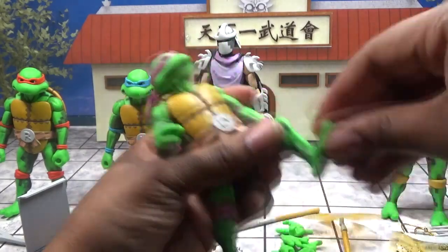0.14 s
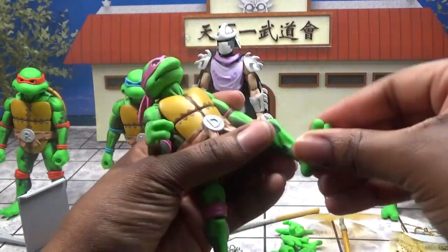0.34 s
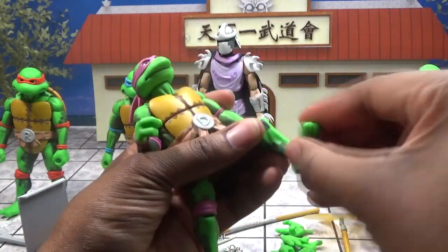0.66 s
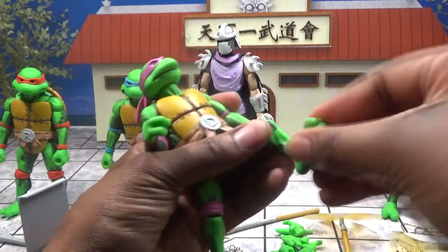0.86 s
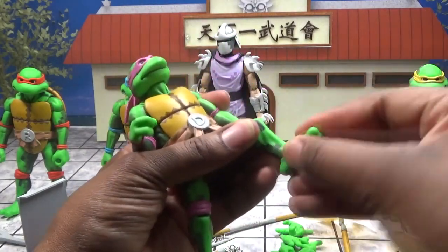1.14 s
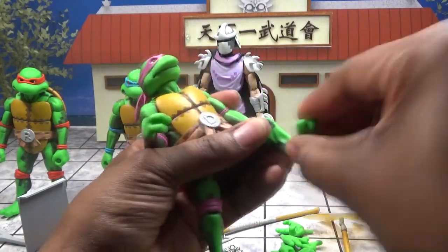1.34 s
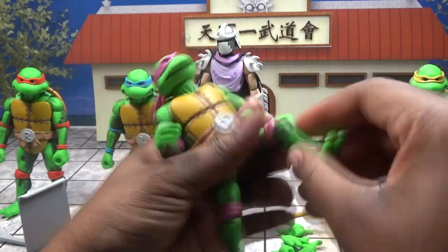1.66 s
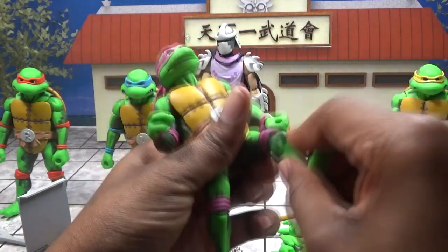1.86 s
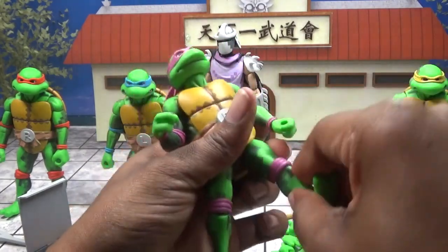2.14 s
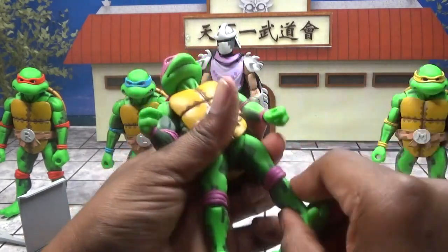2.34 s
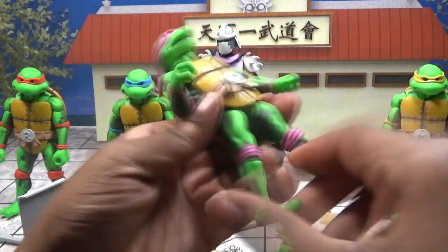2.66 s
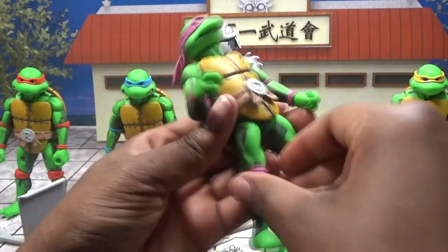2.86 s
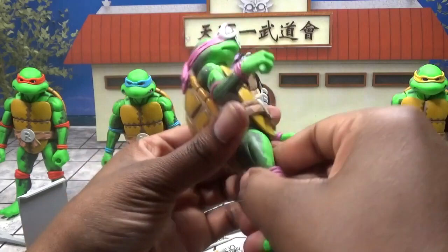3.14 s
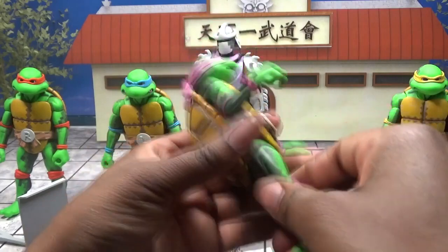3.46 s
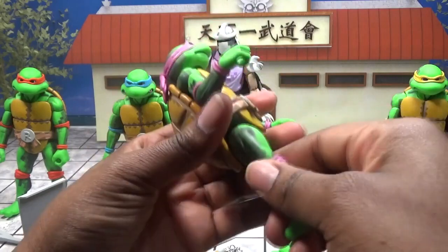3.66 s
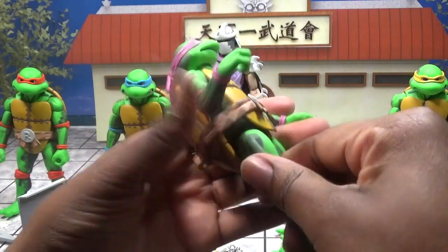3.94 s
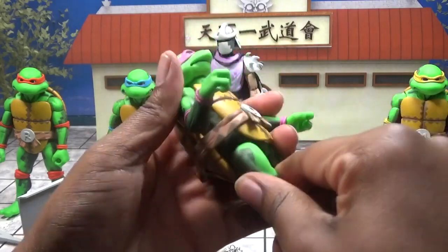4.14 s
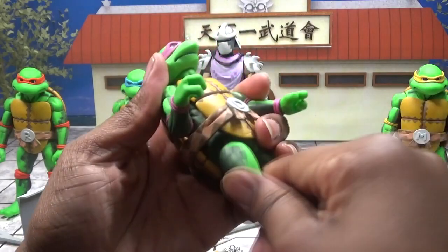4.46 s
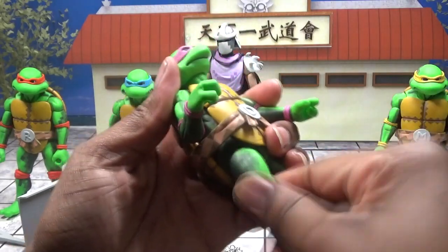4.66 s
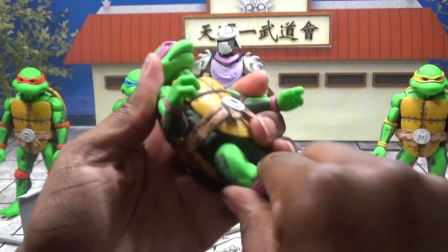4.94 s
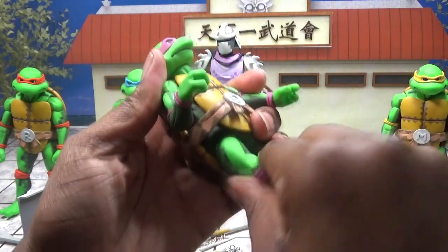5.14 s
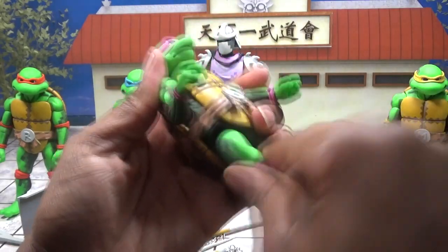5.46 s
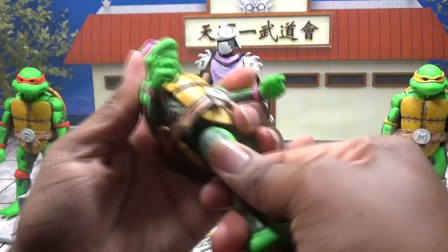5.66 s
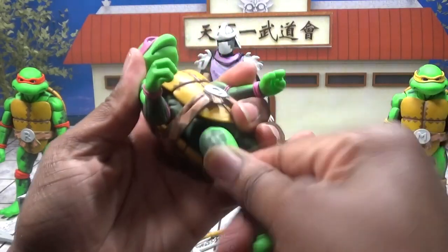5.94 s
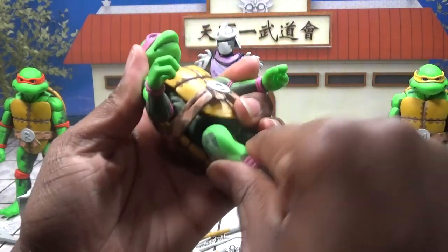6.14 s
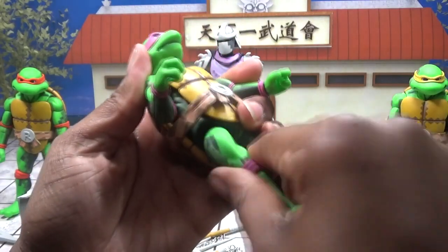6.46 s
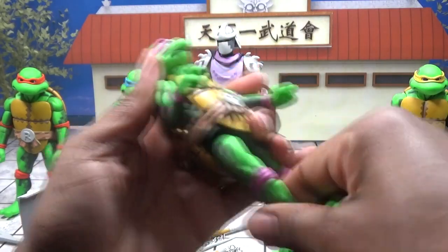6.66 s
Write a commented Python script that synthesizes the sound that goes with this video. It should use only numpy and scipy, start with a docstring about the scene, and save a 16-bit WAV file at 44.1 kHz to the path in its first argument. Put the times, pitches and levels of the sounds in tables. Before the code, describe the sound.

Close, dry handling of a jointed plastic toy indoors: quiet skin rubs and tiny clusters of clicks, occasional brighter snaps, then a dense burst of hard ratchety clacks with brief gritty slides. The clicking eases to medium, uneven ticks until near the end. Each is very short, bright and slightly hollow, with little room reflection. Faint low rumble, mains hum and barely audible distant tones lie behind.

```python
"""Stiff joints of a hollow toy figure

Hands twist the joints of a hollow plastic figure close by in a quiet room. Each slip clicks and rings
damped modes of shell, limb and joint pin. Fingers and sliding joint faces rub as shaped noise with tiny
slips; one joint squeaks. Far low tones drift upward over hum, hiss and a rumble that dips, then grows."""
import sys
import numpy as np
from scipy import signal
from scipy.fft import rfft, irfft, next_fast_len
from scipy.io import wavfile
from scipy.ndimage import uniform_filter1d

SR = 44100
rng = np.random.default_rng(int(sys.argv[2]) if len(sys.argv) > 2 else 0)


def transcribe(u):
    """Save the signal u as a 16-bit wav file named by the first command-line argument.

    u: samples, shape (n,) or (channels, n), limited to [-1, 1]; the rate is SR.
    q: integer samples, one column per channel.
    """
    v = np.clip(np.atleast_2d(u).T, -1, 1)
    q = np.round(v * 32767).astype(np.int16)
    wavfile.write(sys.argv[1], SR, q)


N = 300321
FFT_SIZE = next_fast_len(N)
BINS_HZ = np.fft.rfftfreq(FFT_SIZE, 1 / SR)
RING_SAMPLES = 1024

# joint slips, drive levels: start_s, hollow_db, snap_db
SLIPS = [(0.062, -100, -41), (0.082, -75, -70), (0.3867, -48, -47), (0.412, -46.5, -51), (0.464, -60, -51),
         (0.5297, -56.5, -45.5), (0.5448, -56, -51), (0.558, -52, -45.5), (0.72, -54, -47.5),
         (0.738, -54.5, -51), (0.945, -58, -41), (0.9594, -47.5, -41), (0.974, -51, -42.5),
         (1.0058, -70, -44), (1.3986, -67, -42.5), (1.414, -55, -46), (1.4449, -52.5, -39),
         (1.5906, -50, -42.5), (1.657, -62, -41.5), (1.752, -59, -49), (1.83, -50, -46), (1.8608, -83, -43),
         (1.894, -53, -49), (1.952, -58, -52), (1.976, -53, -57), (1.9864, -51, -51), (2.0017, -42.5, -54),
         (2.014, -49, -42), (2.033, -47, -36), (2.0519, -37, -39), (2.073, -47, -36.5),
         (2.2552, -46.5, -34.5), (2.287, -44, -46), (2.3345, -64, -41.5), (2.3893, -36, -32),
         (2.432, -38, -38.5), (2.773, -46, -50), (3.127, -46, -62), (3.0842, -40, -24),
         (3.1657, -54, -43.5), (3.331, -50, -44.5), (3.4008, -55, -42), (3.821, -60, -46.5),
         (3.873, -40, -28.5), (3.945, -50.5, -48), (3.972, -51, -47), (4.183, -70, -46.5),
         (4.2695, -51, -42), (4.2889, -44, -37), (4.2955, -32.5, -31), (4.374, -62, -29.5),
         (4.3897, -40.5, -28), (4.4864, -35, -34.5), (4.5545, -27, -46), (4.5659, -26.5, -34),
         (4.579, -31, -37), (4.601, -28, -31), (4.6162, -36, -46), (4.6452, -35.5, -68),
         (4.7468, -24.5, -33.5), (4.812, -23, -19), (4.8301, -16.5, -11.5), (4.9102, -14.5, -11),
         (5.028, -27, -51), (5.031, -13.5, -9.5), (5.0657, -17, -9.5), (5.152, -15.5, -8.5),
         (5.2464, -43.5, -40), (5.2688, -30, -17.5), (5.316, -41, -58), (5.3799, -35.5, -39),
         (5.392, -29.5, -31), (5.401, -28, -42), (5.4636, -35.5, -57), (5.4694, -41, -35),
         (5.489, -32.5, -31), (5.5475, -19.5, -34.5), (5.6366, -37.5, -26), (5.6445, -26.5, -18),
         (5.7134, -35.5, -32.5), (5.7216, -35, -29.5), (5.734, -29, -33), (5.768, -31.5, -33),
         (5.7985, -34.5, -31), (5.83, -35, -36), (5.862, -29, -63), (5.942, -36.5, -37),
         (5.9585, -27.5, -20), (5.997, -34.5, -48), (6.0313, -35, -42), (6.062, -37.5, -33),
         (6.1594, -33, -28), (6.1721, -32, -44), (6.2072, -30, -53), (6.2986, -38, -27.5),
         (6.304, -33, -33), (6.357, -36, -36), (6.3734, -43, -37.5), (6.4333, -31, -32.5),
         (6.471, -40, -48), (6.499, -22.5, -34), (6.5946, -50, -31.5), (6.6358, -44.5, -38)]
# hollow shell modes: pitch_hz, relative_db, t60_s
HOLLOW_MODES = [(2044, 8, 0.011), (2416, 2, 0.005), (2720, 0, 0.0056)]
# limb modes: pitch_hz, relative_db, t60_s
KNOCK_MODES = [(3070, -5.5, 0.0015), (3760, -7, 0.0023)]
# joint pin modes: pitch_hz, relative_db, t60_s
SNAP_MODES = [(5930, 7.5, 0.0013), (6940, -6.5, 0.0025), (7830, -4.5, 0.0024), (8830, -2, 0.0022),
              (10200, -3, 0.0014), (13700, -10, 0.0012)]
# hand holding the figure takes the jolt: pitch_hz, relative_db, t60_s
THUD_MODES = [(790, -0.5, 0.0093)]
# limb knocks against shell: start_s, drive_db
LIMB_TAPS = [(4.375, -33)]


def joints():
    """Every slip rings shell, limb and joint pin, after a weak creep as the joint starts to give."""
    start_s, hollow_db, snap_db = np.transpose(SLIPS)[:, :, None]
    n = len(SLIPS)
    knock_db = 0.45 * hollow_db + 0.28 * snap_db - 12.5  # limb shares in both
    thud_db = 0.5 * knock_db - 41.5
    body = amp(hollow_db) * ring(HOLLOW_MODES, count=n, detune=0.022, spread_db=3, rise_s=0.0005)
    body += amp(knock_db) * ring(KNOCK_MODES, count=n, detune=0.04, spread_db=5, rise_s=0.0002)
    snap = amp(snap_db) * ring(SNAP_MODES, count=n, detune=0.02, spread_db=4, rise_s=0.00035)
    thud = amp(thud_db) * ring(THUD_MODES, count=n, detune=0.13, spread_db=6, rise_s=0.00077)

    side, lead, creep = rng.standard_normal((n, 3, 1)).transpose(1, 0, 2)
    side_db = 0.87 * side + 0.23  # hands hide a slip a little from one side or the other
    lead_s = 0.001247 + 0.00052 * abs(lead)
    creep_db = -18.5 + 4.9 * creep
    at = np.round(start_s * SR).astype(int) + np.arange(RING_SAMPLES)
    early = at - np.round(SR * lead_s).astype(int)

    out = np.zeros((2, N + RING_SAMPLES))
    for channel, sign in zip(out, (1, -1)):
        np.add.at(channel, at, (body - snap) * amp(sign * side_db / 2))
        np.add.at(channel, early, (body + 0.15 * snap) * amp(creep_db))

    taps = ring(KNOCK_MODES, count=len(LIMB_TAPS), detune=0.025, spread_db=0, rise_s=0.00017)
    for (tap_s, tap_db), tap in zip(LIMB_TAPS, taps):
        out[:, round(tap_s * SR):][:, :len(tap)] += amp(tap_db) * tap

    jolts = np.zeros(N + RING_SAMPLES)
    np.add.at(jolts, at, thud)
    highpass = signal.butter(2, 1300, "high", fs=SR, output="sos")  # too small to radiate bass
    return signal.sosfilt(highpass, out[:, :N]) + jolts[:N]


def ring(modes, count, detune, spread_db, rise_s):
    """Damped sines, one peak-normalised ring per blow; grip and contact shift pitch, share and phase."""
    pitch_hz, mode_db, t60_s = np.transpose(modes)[:, :, None]
    t = np.arange(RING_SAMPLES) / SR
    draws = rng.standard_normal((count, len(modes), 3, 1))
    shift, share, phase = np.moveaxis(draws, 2, 0)
    # neighbouring modes start near opposite phase
    phase = 0.6 * phase + np.pi * np.arange(len(modes))[:, None]
    level_db = mode_db + spread_db * share - 60 * t / t60_s
    waves = amp(level_db) * np.sin(2 * np.pi * pitch_hz * (1 + detune * shift) * t + phase)
    sound = waves.sum(1) * (1 - np.exp(-t / rise_s)) ** 2
    return sound / abs(sound).max(1, keepdims=True)


# rub spectrum: freq_hz, relative_db_per_hz
RUB_COLOUR = [(500, -15.5), (1500, -19), (3000, -10.5), (4600, -9), (6300, -11), (8700, -9.5), (11500, -17),
              (16500, -32)]
# fingers shifting grip: start_s, end_s, top_db
GRIP_STROKES = [(-0.03, 0.22, -65.5), (0.28, 0.473, -71.5), (1.562, 1.632, -64.5), (1.629, 1.894, -62.5),
                (2.014, 2.082, -59), (2.238, 2.51, -69), (2.53, 2.669, -66.5), (2.655, 3.1, -72),
                (3.1, 3.515, -71), (3.5, 3.743, -70), (3.77, 4.075, -71.5), (4.106, 4.143, -64.5),
                (4.2, 7, -70.5), (4.474, 4.688, -59), (6.597, 6.753, -65)]
# joint faces sliding once free: start_s, level_db
JOINT_TWISTS = [(3.078, -59), (4.389, -60.5), (4.743, -57.5), (4.81, -61), (5.03, -51.5), (5.15, -56.5),
                (5.261, -51.5), (5.378, -61.5), (5.49, -53.5), (5.641, -50.5), (5.787, -54), (5.957, -54.5),
                (6.028, -57), (6.151, -56), (6.299, -54), (6.426, -55.5)]
# duller palm drags: start_s, end_s, top_db
PALM_SCUFFS = [(1.91, 2.107, -65), (3.065, 3.248, -66.5), (4.515, 4.676, -63)]
# one joint squeak: start_s, end_s, pitch_hz, top_db_rms
JOINT_SQUEAK = (.36, .49, 3380, -73)


def fingers():
    """Hiss of sliding with bright ticks, slips that ring the shell, palm drags, one squeak."""
    ticks = patchy(crackle(per_s=300, spread_db=7), depth_db=6)
    hiss = rng.standard_normal(N) + 0.8 * ticks
    shell = grit(HOLLOW_MODES, per_s=40, detune=0.035)
    stroke_power = sum(swell(*row) ** 2 for row in GRIP_STROKES)
    twist_power = sum(twist(*row) ** 2 for row in JOINT_TWISTS)
    level = np.sqrt(stroke_power + twist_power + amp(-79) ** 2)
    rub = level * patchy(coloured(hiss, read(RUB_COLOUR, BINS_HZ)), depth_db=1.8)
    rub += amp(-10) * level ** 0.92 * shell  # light touches ring the shell more than they hiss

    drag = grit(THUD_MODES + HOLLOW_MODES + KNOCK_MODES, per_s=75, detune=0.073)
    rub += drag * sum(swell(*row) for row in PALM_SCUFFS)

    start_s, end_s, squeak_hz, squeak_db = JOINT_SQUEAK
    squeak_band_db = -20 * np.log10(1 + ((BINS_HZ - squeak_hz) / 130) ** 2)
    squeak = evened(coloured(rng.standard_normal(N), squeak_band_db))
    rub += squeak * swell(start_s, end_s, squeak_db)

    # each port hears it slightly differently
    scatter = evened(rng.standard_normal(48)) / np.sqrt(48)
    apart = signal.oaconvolve(rub, scatter)[:N]
    return rub + 0.024 * apart * np.array([[1], [-1]])


def grit(modes, per_s, detune):
    """Tiny slips over noise, each ringing several differently held versions of the modes."""
    total = np.zeros(N)
    for version in ring(modes, count=5, detune=detune, spread_db=4, rise_s=0.0003):
        drive = rng.standard_normal(N) + crackle(per_s, spread_db=6.5)
        total += signal.oaconvolve(drive, version)[:N]
    return evened(total)


def crackle(per_s, spread_db):
    """Scattered single-sample slips of uneven size and random sign."""
    size = amp(spread_db * np.minimum(rng.exponential(1, N), 3))
    hit = rng.random(N) < per_s / SR
    return evened(size * hit * rng.choice([-1, 1], N))


def patchy(x, depth_db):
    """Colour drifts in time-frequency patches as the touching faces change."""
    z = signal.stft(x, nperseg=256)[2]
    field = uniform_filter1d(rng.standard_normal(z.shape), size=9, axis=0)  # across frequency
    field = uniform_filter1d(field, size=24, axis=1)  # across time
    return evened(signal.istft(z * amp(depth_db * evened(field)), nperseg=256)[1][:N])


TWIST_ATTACK_S, TWIST_HOLD_S, TWIST_RELEASE_S = 0.0022, 0.043, 0.05
TWIST_SAG_DB_PER_S = 68


def twist(start_s, level_db):
    """Sliding level: fast attack, sagging hold, then release to silence."""
    t = np.arange(N) / SR - start_s
    corners_s = np.cumsum([0, TWIST_ATTACK_S, TWIST_HOLD_S, TWIST_RELEASE_S])
    shape = np.interp(t, corners_s, [0, 1, 1, 0])
    return amp(level_db - TWIST_SAG_DB_PER_S * np.clip(t, 0, 1)) * shape


SWELL_SHARPNESS = 0.55


def swell(start_s, end_s, top_db):
    """Level that rises and falls as one arch."""
    u = np.clip((np.arange(N) / SR - start_s) / (end_s - start_s), 0, 1)
    return amp(top_db) * (4 * u * (1 - u)) ** SWELL_SHARPNESS


# decay time of the reflections: freq_hz, t60_s
ECHO_T60 = [(1000, 0.37), (4000, 0.19), (14000, 0.031)]


def echoes(x):
    """Sparse reflections from table and walls; the treble dies first."""
    taps = np.zeros((2, 16000))
    at = np.arange(70, 15870, 20) + rng.integers(0, 20, (2, 790))
    np.put_along_axis(taps, at, rng.choice([-1., 1.], at.shape), 1)
    taps = taps[0] + 0.47 * taps[1] * np.array([[1], [-1]])
    hz, t, z = signal.stft(taps, SR, nperseg=128)
    late = amp(-60 * t / read(ECHO_T60, hz)[:, None])
    near = amp(18 - 60 * t / 0.008)  # first reflections, from hands and table top
    tail = signal.istft(z * (late + near), SR, nperseg=128)[1]
    return signal.fftconvolve(x[None], tail / np.linalg.norm(tail[0]), axes=1)[:, :N]


# far tone pairs, perhaps a passing engine: start_s, end_s, low_start_hz, high_start_hz, top_db_rms_per_tone
DRONES = [(3.401, 4.302, 262.3, 425.6, -82), (4.15, 4.8, 358, 485, -80), (6.15, 6.9, 400, 482, -82)]
DRIFT_PER_S = 0.0304  # relative pitch rise


def drone(start_s, end_s, low_hz, high_hz, top_db):
    """Two soft sines that rise slowly together."""
    t = np.arange(N) / SR - start_s
    warped_s = t + DRIFT_PER_S * t ** 2 / 2
    tones = np.sin(2 * np.pi * low_hz * warped_s) + np.sin(2 * np.pi * high_hz * warped_s)
    return swell(start_s, end_s, top_db) * np.sqrt(2) * tones


# room noise spectrum: freq_hz, relative_db_per_hz
ROOM_COLOUR = [(20, -22.5), (50, -3), (120, -8.5), (300, -16), (1200, -21), (3000, -27), (9000, -40),
               (16200, -39.5)]
# rumble dips early, then grows and stays: time_s, level_db
RUMBLE_LEVEL = [(0, -68.5), (1.2, -71.5), (3, -70.5), (4.3, -66.5), (6.81, -66)]
# left-right likeness of room noise: freq_hz, likeness_0_to_1
ROOM_LIKENESS = [(60, 1), (140, 0.97), (900, .2), (4000, 0.18), (15000, 1)]
# mains hum, level before waver: pitch_hz, level_db_rms
MAINS_HUM = [(60, -76), (180, -79.5), (300, -83)]


def room_tone():
    """Rumble that dips, then grows and stays; steady microphone hiss and wavering mains hum."""
    t = np.arange(N) / SR
    likeness = np.clip(read(ROOM_LIKENESS, BINS_HZ), 0, 1)
    colour_db = read(ROOM_COLOUR, BINS_HZ)
    shared, own = rng.standard_normal((2, N))
    mid = coloured(shared, colour_db + 10 * np.log10(1 + likeness))
    side = coloured(own, colour_db + 10 * np.log10(1 - likeness + 1e-4))
    air = np.array([mid + side, mid - side])
    rumble = coloured(air, -10 * np.log10(1 + (BINS_HZ / 700) ** 4))
    hiss = air - rumble
    rumble_rms = np.sqrt(np.mean(rumble ** 2))
    rumble_db = np.interp(t, *np.transpose(RUMBLE_LEVEL))

    hum = np.zeros(N)
    for pitch_hz, level_db in MAINS_HUM:
        waver_db = 4 * evened(coloured(rng.standard_normal(N), -BINS_HZ ** 2))
        tone = np.sqrt(2) * np.sin(2 * np.pi * (pitch_hz * t + rng.random()))
        hum += amp(level_db + waver_db) * tone
    return (amp(rumble_db) * rumble + amp(-70.5) * hiss) / rumble_rms + hum


def amp(db):
    """Decibels to amplitude."""
    return 10 ** (np.asarray(db) / 20)


def evened(x):
    """Scales to unit rms."""
    return x / np.sqrt(np.mean(x ** 2) + 1e-20)


def read(points, hz):
    """Interpolates a table over log frequency."""
    freq_hz, value = np.transpose(points)
    return np.interp(np.log(hz + 1), np.log(freq_hz + 1), value)


def coloured(x, gain_db):
    """Filters a whole track by a gain per FFT bin."""
    return irfft(rfft(x, FFT_SIZE) * amp(gain_db), FFT_SIZE)[..., :N]


def scene():
    """Clicks and rubbing share the echoes; the echoes of the clicks are weaker around 2 kHz."""
    clicks, rub = joints(), fingers()
    click_send_db = -14 - 6 / (1 + ((BINS_HZ - HOLLOW_MODES[0][0]) / 200) ** 2)
    echo_send = coloured(clicks.mean(0), click_send_db) + amp(-18) * rub.mean(0)
    far_tones = sum(drone(*row) for row in DRONES)
    return clicks + rub + echoes(echo_send) + far_tones + room_tone()


EDGE_HZ = 16500


def record(dry):
    """Band limit of the recorder: linear-phase lowpass."""
    lowpass = signal.firwin(511, EDGE_HZ, window=("kaiser", 9), fs=SR)
    return signal.oaconvolve(dry, lowpass[None], "same")


dry = scene()
out = record(dry)
transcribe(out)
```